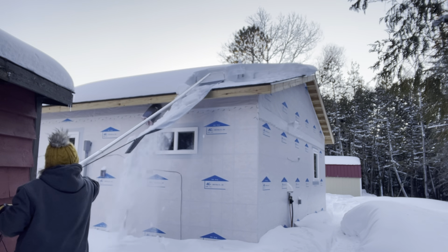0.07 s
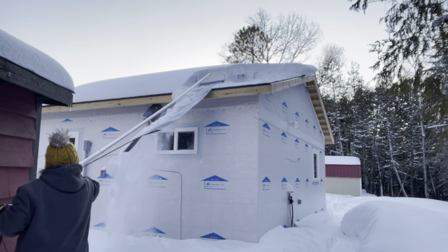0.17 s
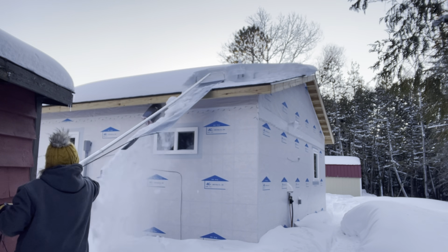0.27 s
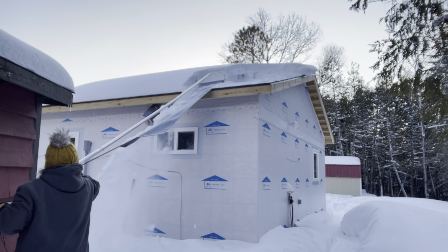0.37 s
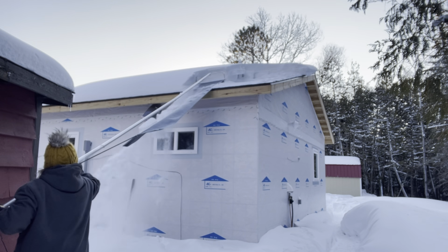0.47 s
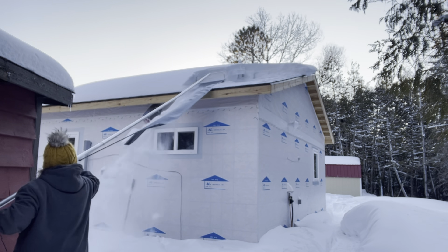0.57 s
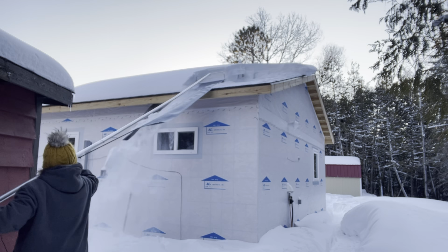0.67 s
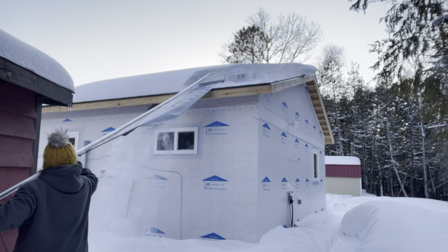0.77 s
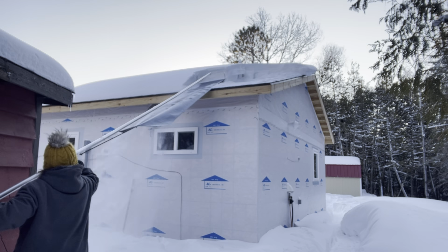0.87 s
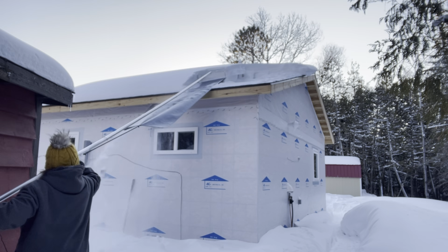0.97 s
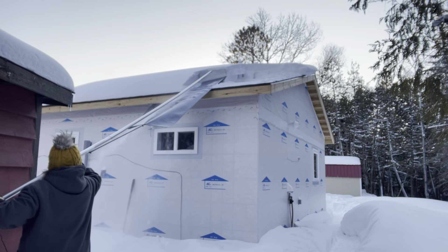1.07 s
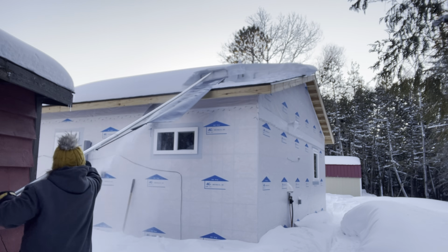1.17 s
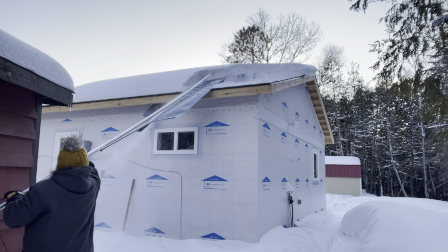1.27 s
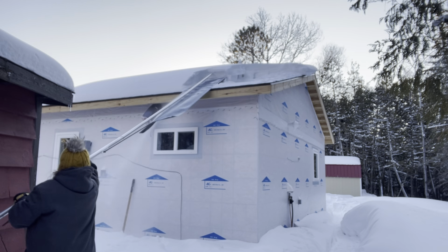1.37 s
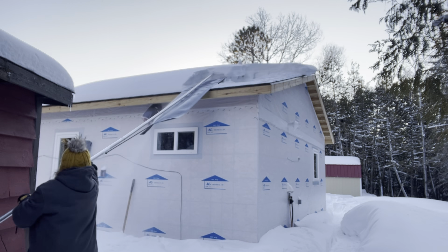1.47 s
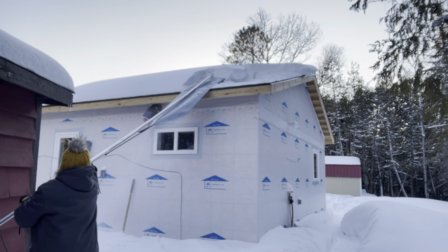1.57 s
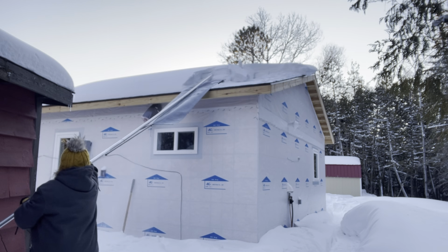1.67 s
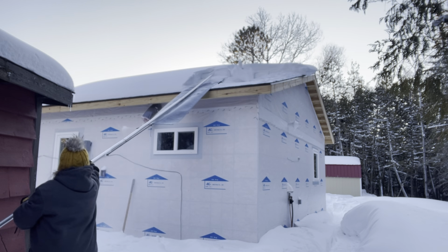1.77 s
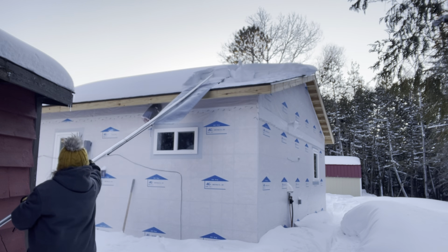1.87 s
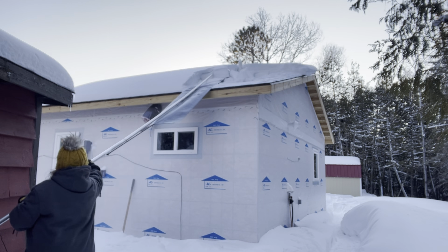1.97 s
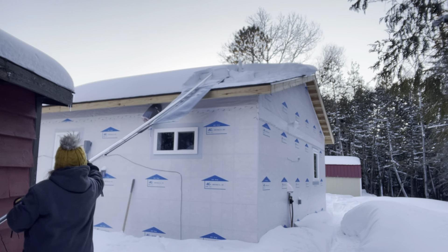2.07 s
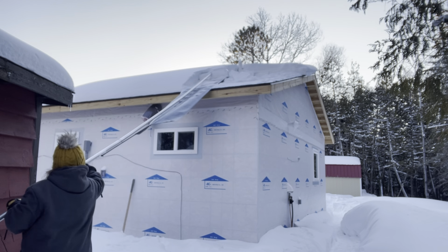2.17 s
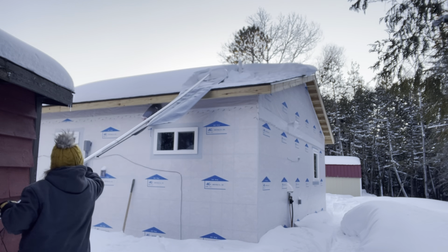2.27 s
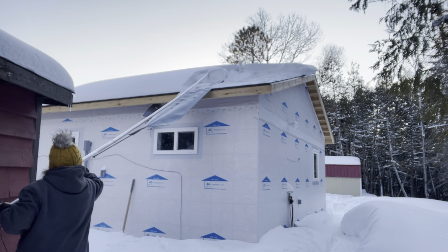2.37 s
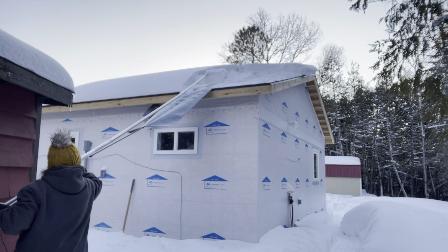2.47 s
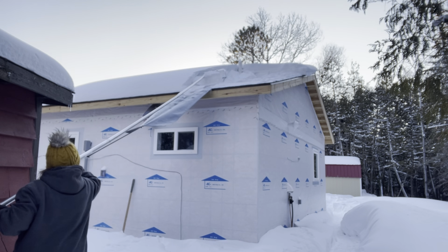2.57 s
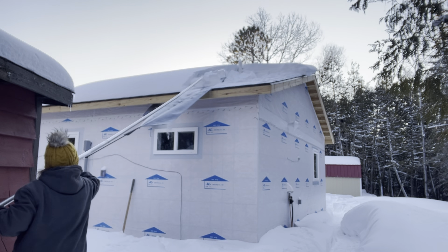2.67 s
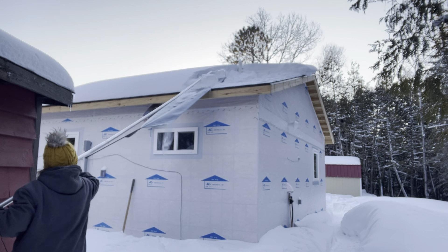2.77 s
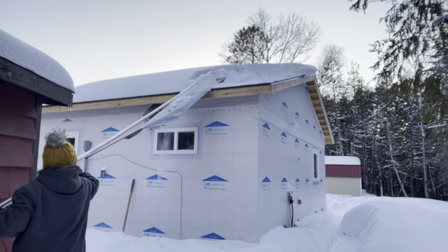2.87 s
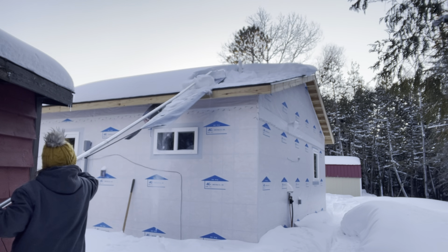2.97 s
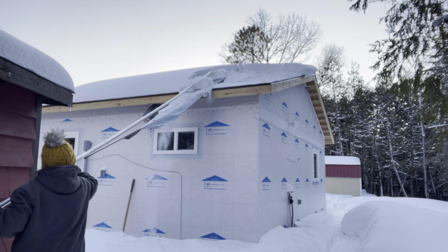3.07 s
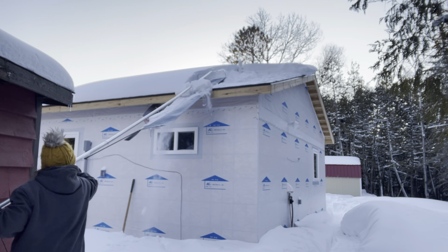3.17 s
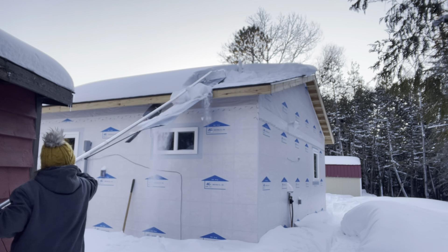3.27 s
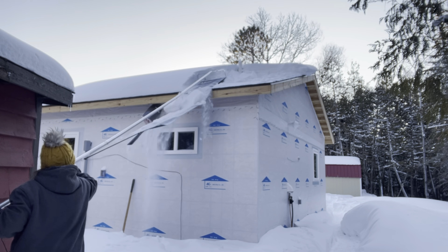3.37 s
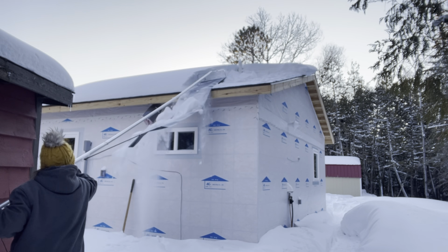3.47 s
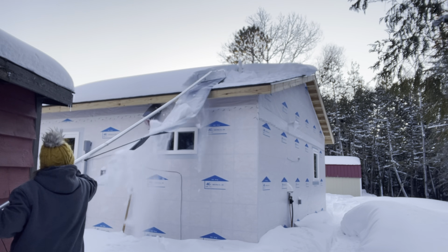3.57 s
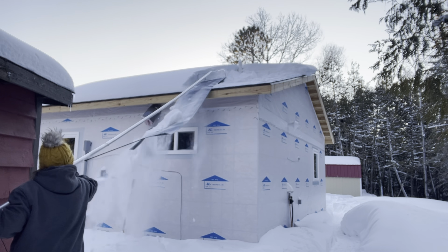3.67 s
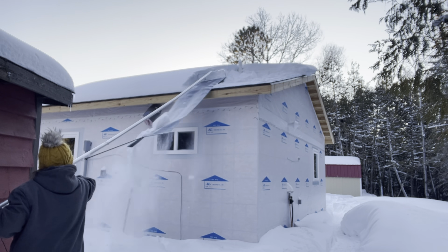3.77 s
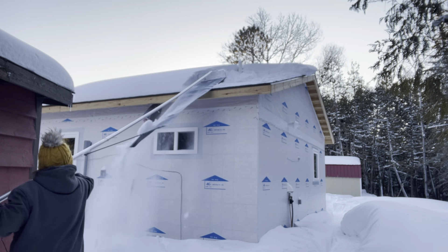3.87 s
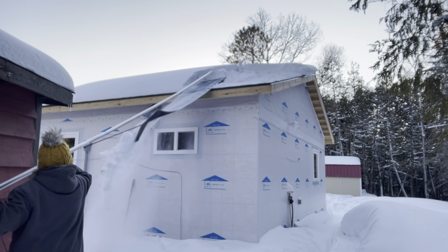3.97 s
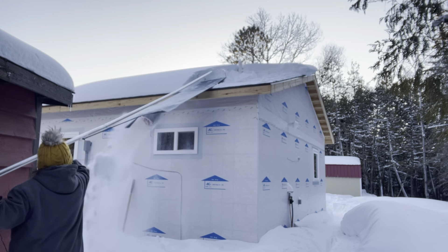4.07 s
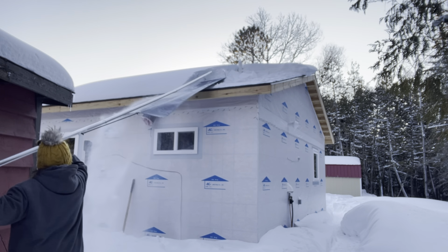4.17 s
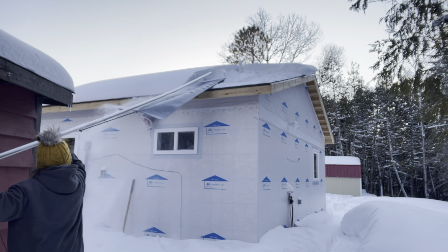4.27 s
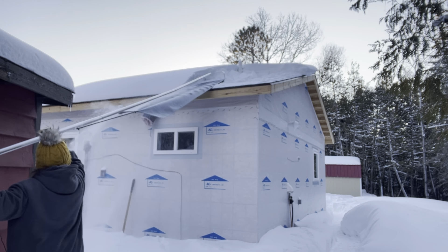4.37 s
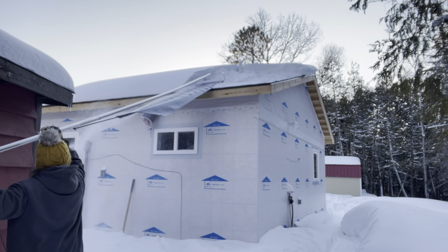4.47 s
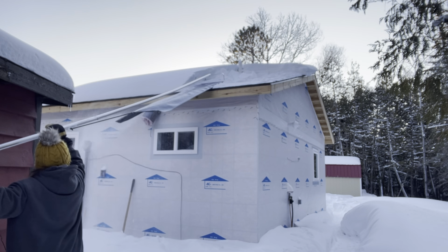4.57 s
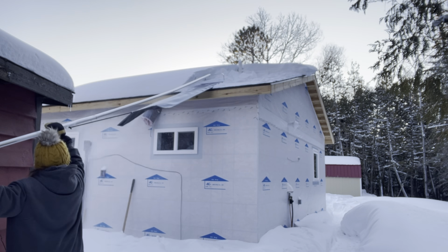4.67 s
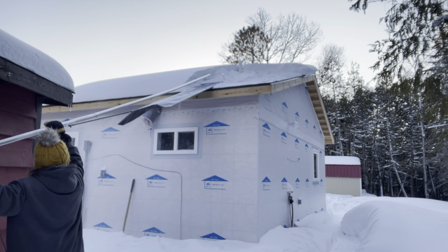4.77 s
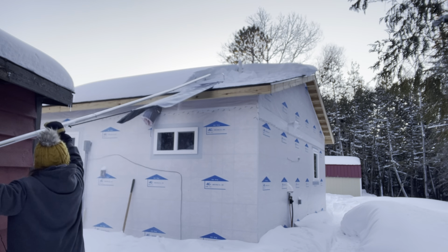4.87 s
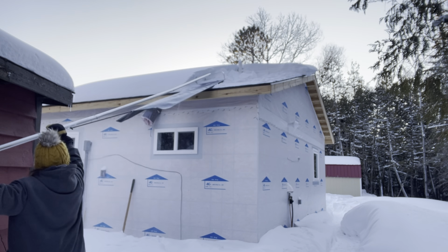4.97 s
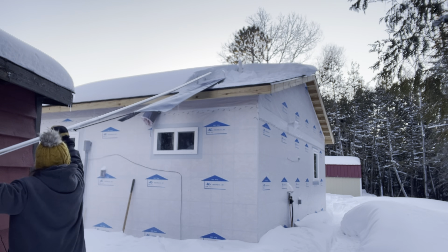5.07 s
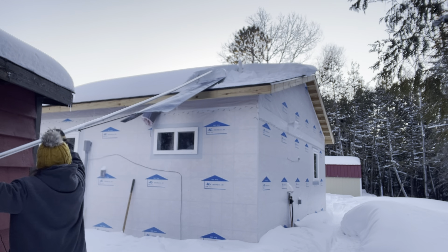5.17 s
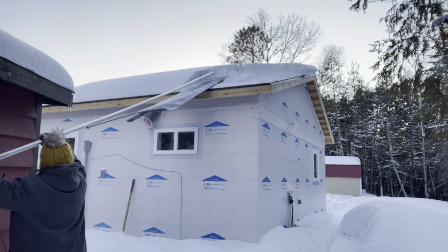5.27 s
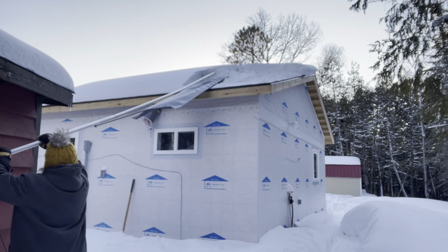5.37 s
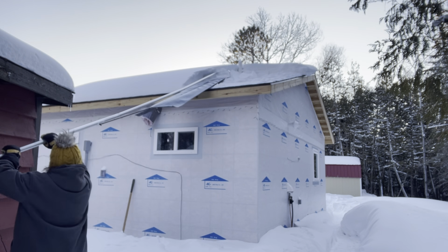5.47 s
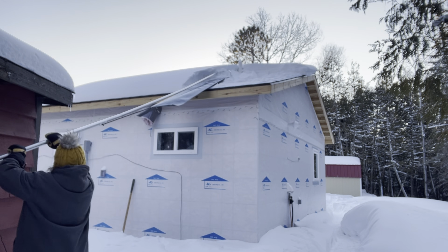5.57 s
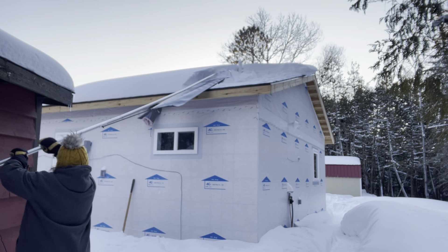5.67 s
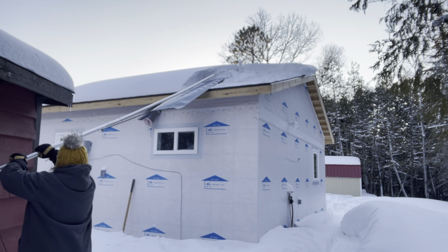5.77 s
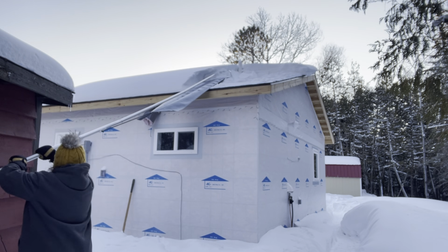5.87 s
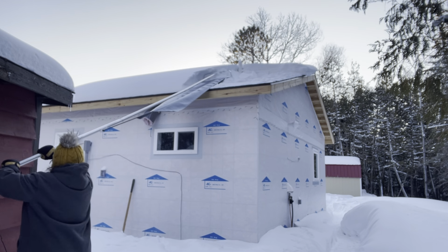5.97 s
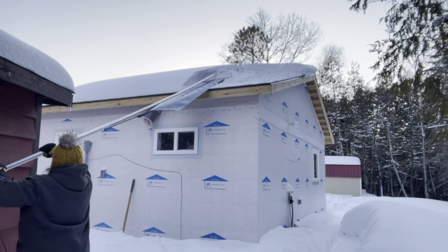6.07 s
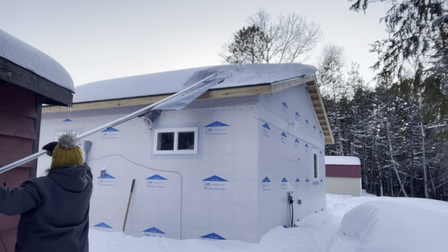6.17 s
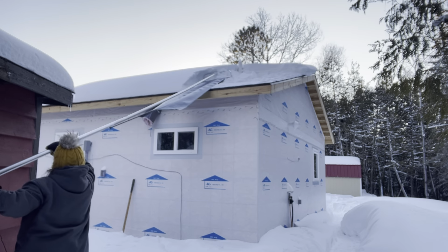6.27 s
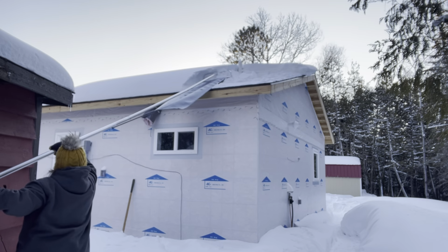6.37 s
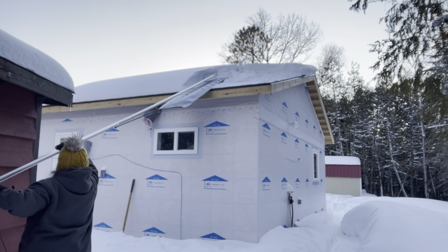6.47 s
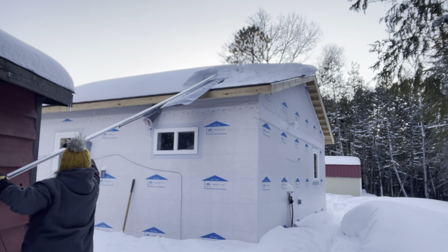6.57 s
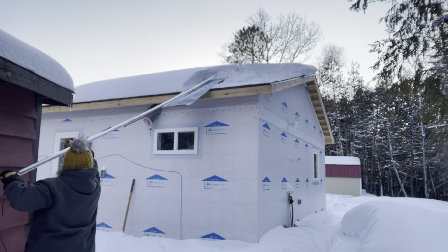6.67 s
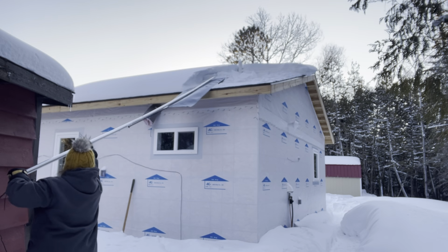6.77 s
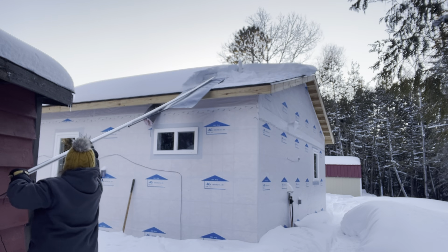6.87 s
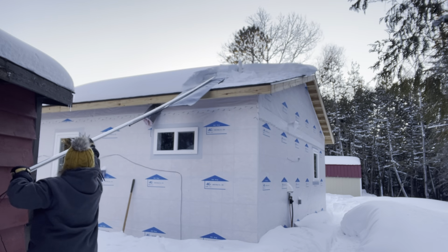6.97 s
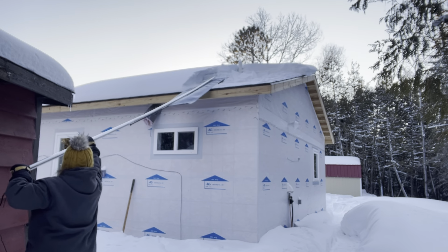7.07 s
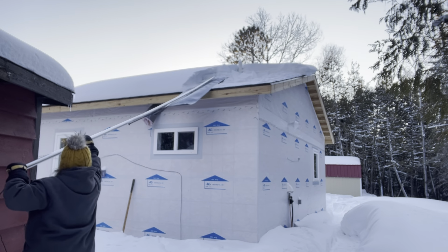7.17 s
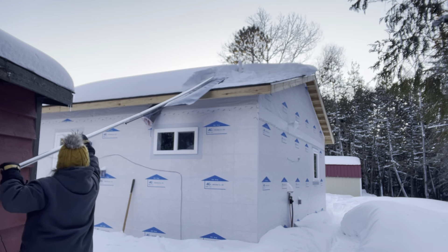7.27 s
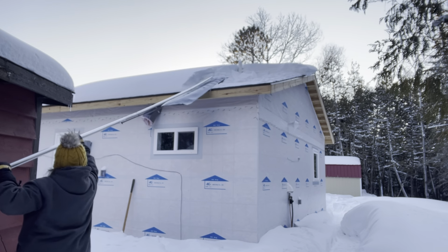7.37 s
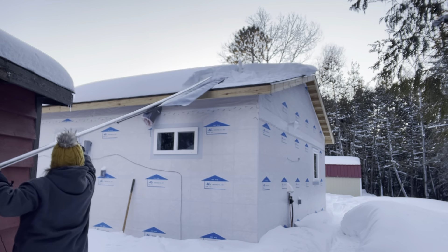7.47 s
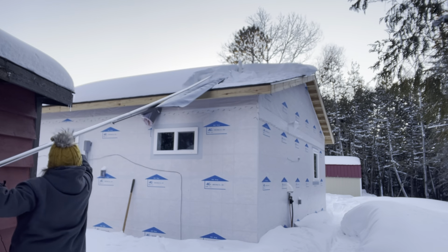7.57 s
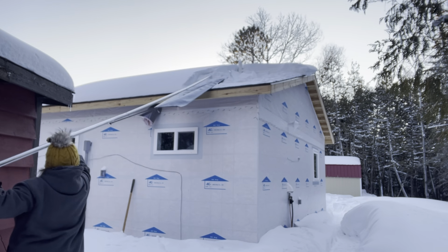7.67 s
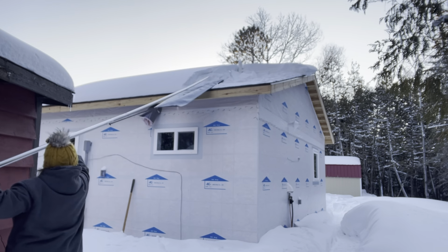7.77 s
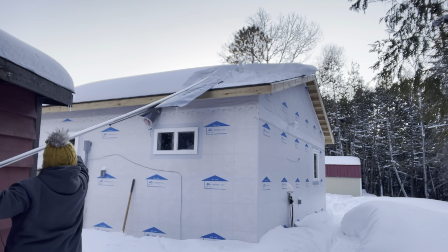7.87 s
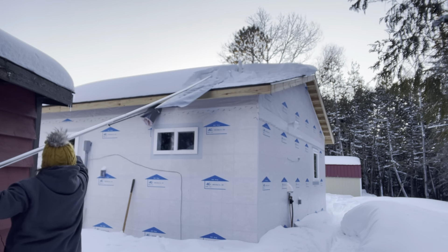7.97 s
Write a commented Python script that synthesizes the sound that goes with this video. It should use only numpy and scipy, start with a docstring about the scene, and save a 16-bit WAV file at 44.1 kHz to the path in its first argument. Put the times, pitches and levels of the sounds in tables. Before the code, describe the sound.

Powdery snow rushes hissing down a plastic sheet in repeated swells, with hollow tube knocks, soft low thuds and a few icy snaps outdoors.

```python
"""A long roof rake is pushed under deep snow, heard by two close microphone ports from a few metres. Powder and
lumps rush down its plastic sheet and thud to the ground; the tube knocks a few times early, and from 1.6 s
knocks more often and rubs on the eave. The hiss swells to 3.5 s, then the heaviest lumps drop around 4.4 s. A
shorter push at 5 s leads to a lull with light ticks and small knocks of the tube; a rush at 6.5 s ends in sharp
icy snaps, and a last push swells to the end. A faint winter hush lies under all. Hiss and flutter are shaped
noise, thuds sinking sines, knocks ringing chirps."""
import sys
import numpy as np
from scipy import signal
from scipy.fft import rfft, irfft, next_fast_len
from scipy.io import wavfile
from scipy.ndimage import uniform_filter1d, map_coordinates

SR = 44100
rng = np.random.default_rng(int(sys.argv[2]) if len(sys.argv) > 2 else 0)


def transcribe(u):
    """Save the signal u as a 16-bit wav file named by the first command-line argument.

    u: samples, shape (n,) or (channels, n), limited to [-1, 1]; the rate is SR.
    q: integer samples, one column per channel.
    """
    v = np.clip(np.atleast_2d(u).T, -1, 1)
    q = np.round(v * 32767).astype(np.int16)
    wavfile.write(sys.argv[1], SR, q)


N = 353373
LEFT_RIGHT = np.array([[1], [-1]])  # signs of the two ports


def amp(db):
    """dB to gain."""
    return 10 ** (np.asarray(db) / 20)


def along(points, hz):
    """Interpolate (frequency [Hz], value) points on a log frequency axis."""
    f, v = np.transpose(points)
    return np.interp(np.log(hz + 1), np.log(f + 1), v)


def curves(rows):
    """One value per sample for each column after the time."""
    s, *cols = np.transpose(rows)
    return [np.interp(np.arange(N) / SR, s, c) for c in cols]


def wobble(rate_hz):
    """A random curve of straight lines between rate_hz knots a second."""
    knots = rng.standard_normal(int(N * rate_hz / SR) + 4)
    return map_coordinates(knots, [np.arange(N) * rate_hz / SR], order=1)


def filtered(x, response):
    """Shape x by a response of frequency, real or complex."""
    m = next_fast_len(N + 8192)
    return irfft(rfft(x, m) * response(np.fft.rfftfreq(m, 1 / SR)), m)[..., :N]


def add(track, s, sound):
    """Mix a short sound in at s seconds."""
    part = track[..., round(s * SR):][..., :sound.shape[-1]]
    part += sound[..., :part.shape[-1]]


def rush(spectrum, grit_db, breadth_db=0):
    """Stereo stream of crystals of unequal size: a common part of rms 1 and a scattered part."""
    # level of the scattered part against the common one: (frequency [Hz], level [dB])
    width = [(60, -2), (250, -8), (700, -5), (1400, -9.5), (2800, -6), (4500, -8.5), (6000, -1),
             (7500, -28), (11000, -5), (12200, -39), (13500, -18), (16000, -3)]
    # phase by which the left port leads: (frequency [Hz], phase [rad])
    port_lead = [(60, 0), (700, -.1), (5100, -.15), (6050, -1.25), (6900, -2.1), (7600, -2.4), (9000, -1.8),
                 (11300, -.15), (12400, 0), (13100, .3), (15800, 1.85)]
    a, b = rng.standard_normal((2, N)) * amp(grit_db * rng.exponential(size=N))

    def common_response(hz):
        return amp(along(spectrum, hz)) * np.exp(.5j * along(port_lead, hz) * LEFT_RIGHT)

    def scattered_response(hz):
        return amp(along(spectrum, hz) + along(width, hz))

    common = filtered(a, common_response)
    scattered = amp(breadth_db) * filtered(b, scattered_response)
    return (common + [scattered, -scattered]) / np.std(common)


def patches(x, depth_db):
    """Random louder and softer islands in time and frequency."""
    z = signal.stft(x, nperseg=1024)[2]
    field = rng.standard_normal(z.shape[-2:])
    field = uniform_filter1d(field, size=3, axis=0)  # over frequency
    field = uniform_filter1d(field, size=4, axis=1)  # over time
    return signal.istft(z * amp(depth_db * field / field.std()), nperseg=1024)[1][..., :N]


def bursts(rows, spectrum, rough_db, breadth_db=9.0):
    """Short, rough swells of noise, leaning left; rows are (time [s], length [s], level [dB])."""
    gate = np.zeros(N)
    for s, length, db in rows:
        add(gate, s, amp(db) * np.sqrt(np.hanning(round(length * SR))))
    roughness = amp(rough_db * wobble(150) + 1.2 * LEFT_RIGHT)
    return gate * roughness * rush(spectrum, 1.0, breadth_db)


def winter_hush():
    """A faint, steady bed of patchy noise, strongest in the lows."""
    # spectrum of the hush: (frequency [Hz], relative density [dB per Hz])
    spectrum = [(18, -42), (30, -33), (118, 11), (632, -20), (801, -18), (1250, -14), (2200, -9),
                (3670, -3), (7670, -6.5), (13700, -5), (16000, -5)]
    return amp(-71.0) * patches(rush(spectrum, grit_db=2.5), depth_db=2.5)


def yard(x):
    """The house wall and trees answer faintly, each frequency dying at its own speed."""
    # decay of the yard: (frequency [Hz], t60 [s])
    decay = [(100, 0.25), (1000, 0.44), (8000, 0.16)]
    hz, t, z = signal.stft(rng.standard_normal((2, SR // 3)), SR, nperseg=256)
    fade = amp(-60 * t / along(decay, hz)[:, None])
    tail = signal.istft(z * fade, SR, nperseg=256)[1]
    delayed = np.pad(x, (600, 0))[None]  # 600 samples, about 14 ms
    return signal.fftconvolve(delayed, tail / np.linalg.norm(tail[0]), axes=1)[:, :N]


def loose_snow():
    """Loose snow landing at four times is a low rumble of noise over a faint trickle."""
    # pours: (start [s], rise [s], hold [s], top level before the wobble [dB])
    pours = [(0, 0.25, 0.66, -63), (1.1, 0.55, 0.42, -66.5), (3.594, 0.31, 0.56, -70),
             (6.2, 0.44, 0.25, -72)]
    # spectrum of the rumble: (frequency [Hz], relative density [dB per Hz])
    rumble = [(20, -45), (38, -13), (60, -7.5), (100, -8.5), (170, -9.5), (300, -37)]
    trickle_db, rise_db, fade_db_per_s = -83.5, 16, 50
    now = np.arange(N) / SR
    pour = np.full(N, amp(trickle_db))
    for s, rise, hold, db in pours:
        below_top_db = rise_db * np.clip(1 - (now - s) / rise, 0, 1)
        faded_db = fade_db_per_s * np.clip(now - s - rise - hold, 0, None)
        pour += (now >= s) * amp(db - below_top_db - faded_db)
    return pour * amp(3 * wobble(14)) * rush(rumble, grit_db=0, breadth_db=-5)


def thuds():
    """Lumps, and one thump of the pole at 2.012 s: soft pushes whose pitch sinks, for lumps as the snow packs."""
    # thuds: (time [s], peak level before the port filter [dB], t60 [s], settled pitch [Hz],
    #         first pitch above that [share of it])
    pushes = [(0.004, -52, .12, 52, 0.8), (0.165, -41.5, .12, 46, 3.3), (.232, -55, .1, 48, 1),
              (0.304, -46, .16, 53.7, 0.99), (.36, -43, 0.045, 70, 2), (.382, -48, .1, 50, .5),
              (0.432, -42.5, 0.09, 58, 1.1), (.47, -46, 0.14, 48, .5), (0.535, -50, .15, 52, 1),
              (.585, -50, .12, 66, .5), (0.635, -50, .12, 52, .8), (.67, -49, 0.13, 68, .4),
              (0.723, -53, .11, 56, 0.91), (0.769, -50, .11, 60, 1.2), (0.846, -32.5, .13, 53.7, 2.2),
              (0.912, -47, .1, 58, 1.5), (0.99, -52, 0.11, 62, .8), (1.023, -50, .08, 60, 2),
              (1.039, -41, 0.1, 54, .68), (1.25, -56, .1, 62, 1.2), (1.283, -56, 0.072, 66, 1),
              (1.322, -52, .07, 58, 1.4), (2.012, -36, 0.042, 54, 2.7), (3.675, -59, .099, 54, 1.7),
              (3.849, -56, .1, 58, 1.7), (3.91, -54, .08, 62, 1), (3.958, -47, .06, 60, 1),
              (3.984, -43, 0.1, 58, 1.4), (4.006, -37, .06, 66, 2.5), (4.033, -44, .099, 56, 1.2),
              (4.159, -59.5, .08, 60, .8), (4.215, -57, .1, 54, .5), (4.258, -49, .1, 54, .8),
              (4.292, -51, .05, 58, 1.7), (4.309, -44, .05, 60, 3.2), (4.317, -41, 0.14, 60, 0.56),
              (4.343, -34.5, .06, 54, 2.5), (4.354, -23, 0.16, 54, 0.5), (4.384, -36, .04, 62, 1.3),
              (4.393, -41, .05, 66, 2.1), (4.404, -38, 0.037, 58, 1.1), (4.423, -40, 0.11, 58, .66),
              (4.441, -38, .09, 54, .2), (4.463, -45, .09, 56, .2), (4.53, -57, .1, 56, .5),
              (6.835, -49, 0.09, 60, 2.5)]
    track, t = np.zeros(N), np.arange(SR // 4) / SR
    sink_s, attack_s = .006, .0013
    for s, db, t60, settled_hz, sharp in pushes:
        turns = settled_hz * (t + sharp * sink_s * (1 - np.exp(-t / sink_s)))
        envelope = amp(-60 * t / t60) * (1 - np.exp(-t / attack_s))
        push = envelope * np.sin(2 * np.pi * turns)
        add(track, s, amp(db) * push / np.abs(push).max())

    def at_ports(hz):
        low_cut = hz ** 2 / (hz ** 2 + 24 ** 2)
        lead = np.exp(.0015j * hz * LEFT_RIGHT)  # left is earlier by about half a millisecond
        return amp(.7 * LEFT_RIGHT) * low_cut * lead

    return filtered(track, at_ports)


def crunches():
    """Crunches and scuffs of snow, some as lumps strike: short bursts of rough noise."""
    # crunches and scuffs: (time [s], length [s], level [dB])
    grinds = [(.842, 0.019, -57), (4, 0.029, -41.5), (4.34, 0.095, -52.5), (4.368, 0.023, -58),
              (5.02, 0.042, -53), (5.28, 0.072, -60), (6.795, 0.033, -58)]
    # spectrum of the bursts: (frequency [Hz], relative density [dB per Hz])
    spectrum = [(150, -38), (350, 2), (800, 1), (1800, -4.5), (4000, -11.5), (7000, -49)]
    return bursts(grinds, spectrum, rough_db=3.5)


def sharp_ticks():
    """Sharp ticks: bits of ice snapping on the sheet, and near 6.1 s light ticks of the tube in the lull. Each
    is noise that dies in 4 ms, thinned in the lows."""
    # ticks: (time [s], level before a 2 dB trim and the low cut [dB])
    snaps = [(6.068, -54), (6.073, -56), (6.079, -50), (6.087, -53), (6.11, -51), (6.153, -50),
             (6.253, -48), (6.2654, -47), (6.843, -31), (6.8494, -40), (6.8564, -35), (6.944, -39),
             (6.9524, -38), (7.002, -50), (7.0334, -52)]
    track, t = np.zeros(N), np.arange(SR // 50) / SR
    for s, db in snaps:
        add(track, s, amp(db - 2 - 60 * t / .004) * rng.standard_normal(len(t)))
    return filtered(track, lambda hz: hz / (hz + 900))


def eave_rubs():
    """Uneven slips on the eave excite the pipe tones of the tube."""
    # rubs: (time [s], length [s], lower tone level [dB], upper tones level [dB])
    slips = [(1.63, .065, -56, -55), (1.773, 0.13, -61, -55), (2.079, 0.036, -62, -57),
             (2.612, 0.03, -56, -51), (4.51, 0.1, -61, -80), (7.653, 0.053, -55, -50.5)]
    # spectra of the lower tone and the upper tones: (frequency [Hz], relative density [dB per Hz])
    low_tone = [(420, -26), (620, -6), (760, 1), (950, -8), (1250, -30)]
    high_tones = [(1050, -28), (1420, 2), (1750, -14), (2100, -10), (3000, -24)]
    low_rows = [(s, length, low_db) for s, length, low_db, _ in slips]
    high_rows = [(s, length, high_db) for s, length, _, high_db in slips]
    low = bursts(low_rows, low_tone, rough_db=2.5, breadth_db=0)
    return low + bursts(high_rows, high_tones, rough_db=2.5)


def tube_knocks():
    """Bending waves run along the tube, high ones first: each knock is a falling chirp that wakes the modes."""
    # knocks of the joints: (time [s], peak level of the two ports' mean before the left lean [dB],
    #                        most excited pitch [Hz], narrowness, at least 2 in use [dB per squared octave])
    knocks = [(0.846, -44, 480, 15), (1.022, -52, 380, 12), (1.245, -41, 750, 25), (1.591, -42, 1350, 30),
              (1.593, -47, 330, 3), (1.624, -37.5, 640, 15), (1.628, -44, 240, 16), (1.632, -39, 1400, 45),
              (1.639, -43, 1350, 45), (1.658, -42, 1390, 35), (1.732, -36, 403, 8), (1.781, -46, 1400, 45),
              (1.812, -48, 480, 8), (1.832, -50, 1480, 45), (1.845, -39.5, 400, 23), (1.854, -38, 420, 3),
              (1.912, -36.5, 640, 18), (1.919, -41, 260, 14), (1.956, -44.5, 1560, 1.5),
              (2.005, -25, 284, 26), (2.073, -40.5, 1390, 11), (2.299, -45, 288, 34), (2.617, -43, 1470, 7),
              (4.001, -34, 357, 0), (4.011, -36, 320, 16), (4.016, -44, 1400, 11), (4.227, -39, 307, 10),
              (4.356, -39, 480, 20), (4.379, -40, 440, 17), (5.038, -61, 560, 21), (5.052, -54, 656, 21),
              (5.287, -44.5, 620, 24), (5.3, -51, 504, 20), (5.316, -49, 524, 23), (5.33, -45, 625, 28),
              (5.833, -59, 1160, 45), (6.068, -59, 1500, 10), (6.077, -58, 1610, 18),
              (6.087, -56, 1600, 20), (6.09, -71, 380, 25), (6.115, -75, 400, 25), (6.16, -69, 400, 20),
              (6.3, -65, 300, 25), (6.11, -54, 1520, 20), (6.153, -56, 1550, 12), (6.291, -60, 650, 9),
              (6.304, -61, 950, 14), (6.8, -40, 635, 15), (6.874, -52.5, 624, 4), (6.981, -58, 947, 8),
              (7.014, -52, 360, -0.5), (7.178, -50, 328, 1), (7.587, -46, 322, 12)]
    # ringing modes of the tube: (frequency [Hz], width [Hz], level against the bare knock [dB])
    tube_modes = [(176, 18, 3.5), (308, 42, 10), (398, 120, 4.5), (703, 61, 7.5), (1370, 48, 8)]
    track, size = np.zeros((2, N)), 8192
    early = .02  # s of room ahead of each knock
    hz = np.fft.rfftfreq(size, 1 / SR) + 1
    ringing = 1 + sum(amp(db) * 1j * hz * w / (c * c - hz * hz + 1j * hz * w) for c, w, db in tube_modes)
    lead = np.exp(.72j * LEFT_RIGHT)  # the tube stands to the left
    lean = amp(3 * LEFT_RIGHT / 2)  # left 3 dB above right
    for s, db, pitch_hz, narrow_db in knocks:
        octaves = np.log2(hz / pitch_hz)
        slope = np.where(octaves < 0, .55, 1.2)  # fuller below its pitch
        contact = amp(-max(narrow_db, 2) * slope * octaves ** 2)
        # turns of lag: the delay falls as 1 / sqrt(Hz)
        travel = 0.13 * (2 * np.sqrt(hz) - hz / np.sqrt(4.5 * pitch_hz))
        lag = np.exp(-2j * np.pi * (travel + early * hz))
        knock = irfft(contact * ringing * lead * lag, size)
        add(track, s - early, amp(db) * lean * knock / np.abs(knock.mean(axis=0)).max())
    return track


def snow_slide():
    """Crystals hiss over the plastic in uneven clumps and set the sheet fluttering."""
    # snow on the sheet, one table per push or pause: (time [s], hiss level [dB], fine powder above the hiss [dB])
    pushes = [
        [(0, -40.5, 4), (.18, -40, 3), (.33, -40, 2.5), (.5, -44, 3.5), (.7, -48.5, 5.5), (.95, -53, 3),
         (.992, -49.5, 4), (1.14, -49.5, 3), (1.19, -45.5, 3.5), (1.26, -49, 4.5), (1.33, -49.5, 4.5),
         (1.4, -48, 2.5), (1.45, -49.5, 3.5), (1.542, -49, 2), (1.6, -54, 2)],
        [(1.62, -56.5, 3), (1.66, -52.5, -2), (1.718, -57.5, 3.5), (1.76, -56.5, 4), (1.81, -55, 2),
         (1.94, -53, 0.5), (2.13, -49, -0.5), (2.294, -50, 2.5), (2.4, -49, -1.5)],
        [(2.45, -47.5, -2), (2.892, -43, -2.5), (3.122, -41.5, 1), (3.16, -39.5, 1), (3.36, -38, 4),
         (3.49, -36, 4.5), (3.634, -37, 3), (3.95, -41.5, 5), (4.13, -55, 7)],
        [(4.34, -57, 4.5), (4.47, -60.5, 5.5), (4.55, -59, 3.5), (4.65, -63, 6), (4.782, -66, 7),
         (4.9, -65, 5.5)],
        [(4.98, -53.5, 2), (5.02, -54.5, 3.5), (5.1, -50, 1.5), (5.125, -46.5, 2.5), (5.176, -53, 3.5),
         (5.222, -49.5, 1.5), (5.262, -57.5, 2), (5.285, -51, 4.5), (5.38, -48.5, 5.5), (5.43, -51, 7),
         (5.59, -50.5, 4.5), (5.708, -56.5, -0.5)],
        [(5.8, -75, 5), (6.05, -76.5, 7), (6.1, -67, -1), (6.2, -74.5, 6), (6.28, -69, 1), (6.36, -68.5, 1)],
        [(6.418, -54, 2.5), (6.53, -47.5, 3), (6.69, -44, 3.5), (6.78, -45.5, 2.5), (6.81, -44.5, 4),
         (6.848, -55.5, 6), (6.875, -68.5, 4)],
        [(6.924, -69.5, 5), (6.934, -69, 6), (6.945, -60, 10), (6.955, -64, 11), (6.975, -77, 8)],
        [(7.02, -70.5, -1), (7.074, -59, 0), (7.132, -53.5, 2.5), (7.33, -48.5, 4.5), (7.438, -53, 5.5),
         (7.63, -52.5, 2), (7.686, -48.5, -3), (7.776, -47, -0.5), (8.01, -43.5, -2.5)],
    ]
    # how the load drums the sheet: (time [s], taut flutter above the hiss [dB], slack flap above the hiss [dB],
    #                                breadth of the stream [dB])
    drumming = [(0, -3.5, -14.5, 0), (.35, -5, -15, -2), (.7, -4, -15.5, 1.5), (.9, -8.5, -16, -9),
                (1.1, -9.5, -18, -14), (1.25, -8.5, -8, -3.5), (2.55, -7.5, -10.5, -8.5),
                (2.64, -7.5, -21, -6), (2.72, -14, -25, -7), (2.8, -17, -26, -7), (2.95, -18, -26, -7),
                (3.1, -15, -25, -9), (3.24, -7.5, -23.5, -9), (3.4, -6, -29.5, -1), (3.55, -5, -29.5, -1.5),
                (3.85, -5, -26, 3), (4, -6.5, -11.5, 5), (4.75, -9.5, -16, 5.5), (5.03, -7, -10, -7),
                (5.4, -13, -15.5, -9), (5.65, -13.5, -20.5, -3), (5.8, 0, -13, 7), (6.0, -9.5, -8, 9),
                (6.22, -7, -8, 5), (6.35, -6.5, -13, -1), (6.5, -10, -10.5, -9), (6.8, -7.5, -7, -7),
                (7, 0.5, -3.5, 8), (7.12, -12.5, -11.5, -27), (7.6, -10, -9, -12), (8.01, -7.5, -16, -16)]
    # how deep the flutter reaches: (time [s], lower part against upper part before the low trim [dB])
    flutter_depth = [(0, -2.5), (.7, -3), (1.2, 0.5), (2.6, 0.5), (2.7, -5), (2.9, -2), (3.1, -3),
                     (3.2, -6), (3.3, -7), (3.4, -1), (3.9, -2.5), (4.5, 0.5), (5.2, -1), (5.85, -1.5),
                     (5.92, 1), (6.24, -10), (6.3, 3.5), (7, 2.5), (8.01, -0.5)]
    # spectra of the five layers: (frequency [Hz], relative density [dB per Hz])
    hiss_spectrum = [(800, -36), (1120, -20), (1260, -4), (1600, -0.5), (2700, -2), (4000, -1.5),
                     (5500, -3.5), (6300, -2.5), (7300, -3), (9000, -57)]
    powder_spectrum = [(6000, -73), (7500, 4.5), (9000, 2.5), (10500, 4), (13000, 3.5), (15000, 9),
                       (16000, -11)]
    flutter_spectrum = [(650, -33), (880, 0), (1150, 0.5), (1500, -6.5), (2300, -23)]
    low_flutter_spectrum = [(400, -36.5), (540, -3.5), (780, 0), (1000, -26.5)]
    flap_spectrum = [(120, -16), (220, -6), (320, 0), (520, -1.5), (750, -23.5)]
    low_trim_db = -3.5
    hiss_db, powder_db = curves(np.concatenate(pushes))
    flutter_db, flap_db, breadth_db = curves(drumming)
    depth_db, = curves(flutter_depth)
    clumps_db = 0.14 * wobble(14) + 0.73 * wobble(45)
    lean = amp(2 * LEFT_RIGHT / 2)  # low drumming: left 2 dB above right

    hiss = patches(rush(hiss_spectrum, 0.29, breadth_db), depth_db=1.89)
    powder = patches(rush(powder_spectrum, grit_db=0.0), depth_db=1.06)
    powder = amp(powder_db + 0.27 * wobble(22)) * powder
    flutter = patches(rush(flutter_spectrum, 2.04, breadth_db=-1.5), depth_db=1.5)
    flutter = amp(flutter_db + 0.15 * wobble(30)) * flutter
    low_flutter = patches(rush(low_flutter_spectrum, 1.96, breadth_db=-2), depth_db=2.0)
    low_flutter = amp(flutter_db + depth_db + low_trim_db + 0.38 * wobble(26)) * lean * low_flutter
    flap = rush(flap_spectrum, 2.06, breadth_db=-1.5)
    flap = amp(flap_db + 1.4 * wobble(21)) * lean * flap
    return amp(hiss_db + clumps_db) * (hiss + powder + flutter + low_flutter + flap)


def scene():
    """All sources at the two ports; the yard answers the knocks and ticks."""
    hits = tube_knocks() + sharp_ticks()
    background = winter_hush() + amp(-19) * yard(hits.mean(axis=0))
    low_hits = loose_snow() + thuds() + crunches()
    return background + low_hits + hits + eave_rubs() + snow_slide()


def record(dry):
    """Nothing is kept above the 15.8 kHz band limit."""
    return filtered(dry, lambda hz: hz < 15800)


dry = scene()
out = record(dry)
transcribe(out)
```